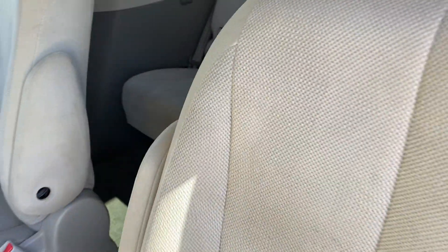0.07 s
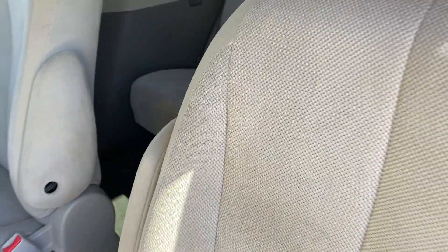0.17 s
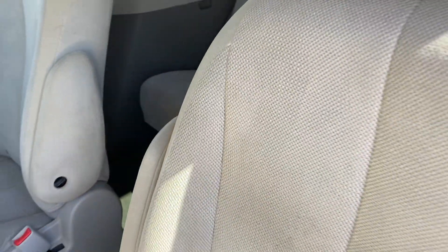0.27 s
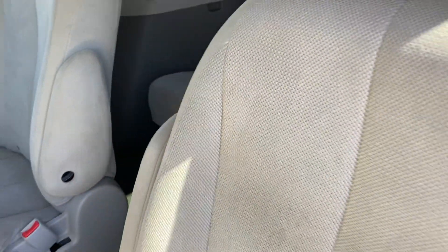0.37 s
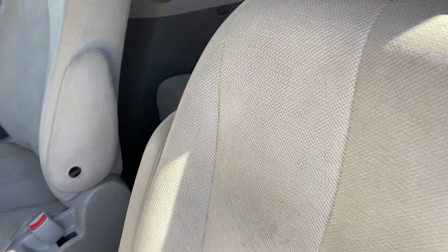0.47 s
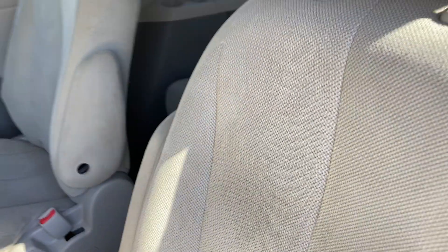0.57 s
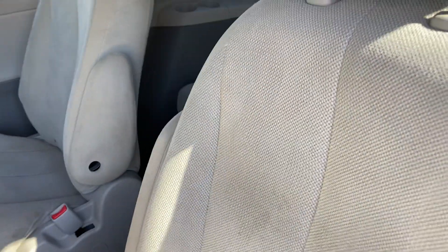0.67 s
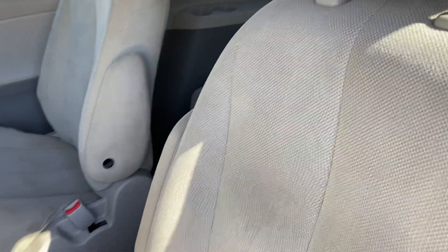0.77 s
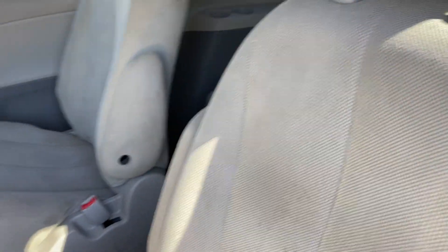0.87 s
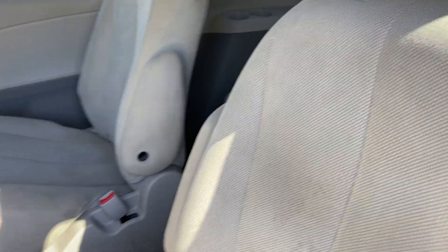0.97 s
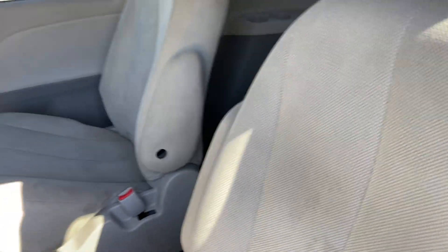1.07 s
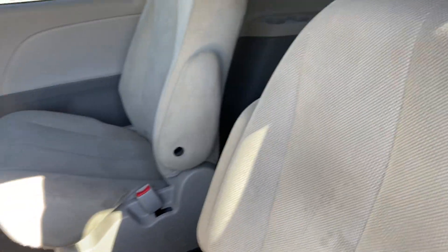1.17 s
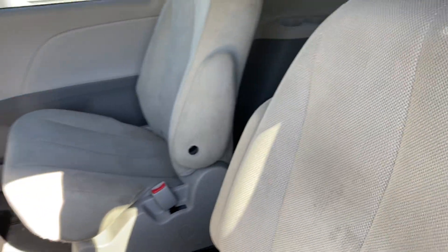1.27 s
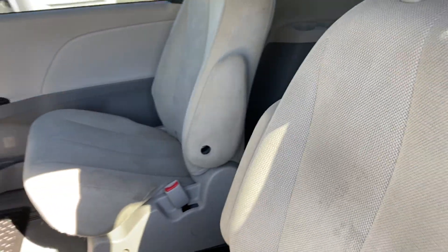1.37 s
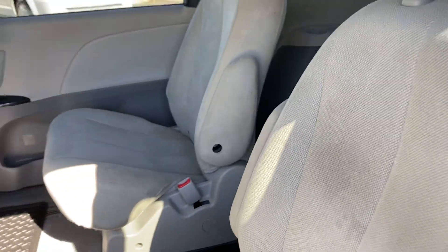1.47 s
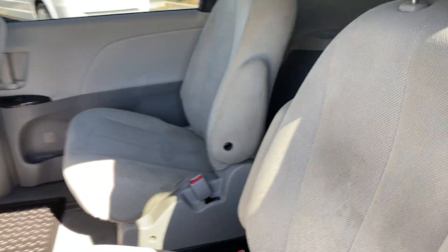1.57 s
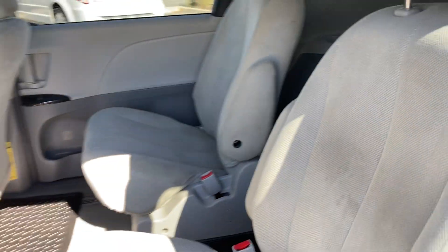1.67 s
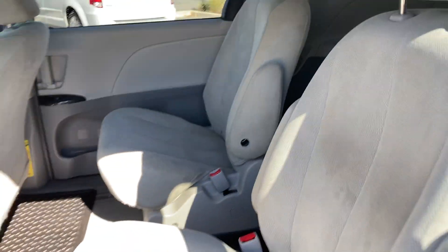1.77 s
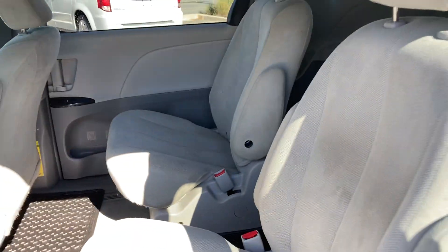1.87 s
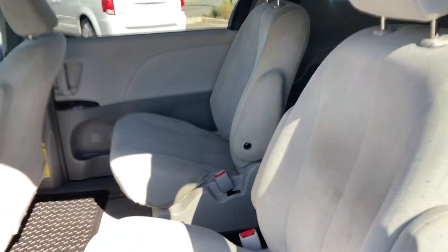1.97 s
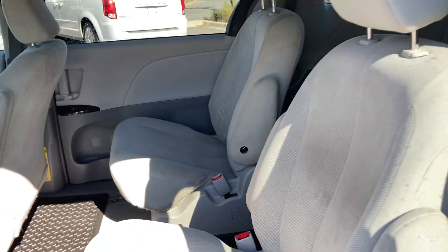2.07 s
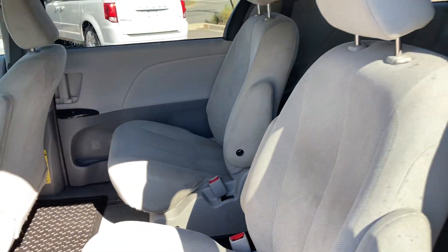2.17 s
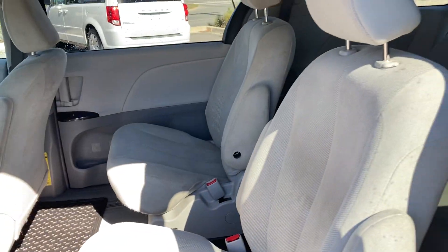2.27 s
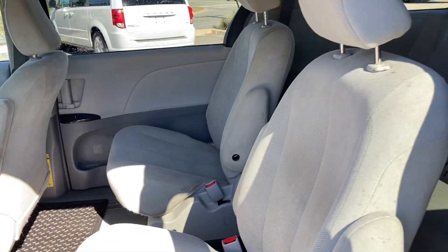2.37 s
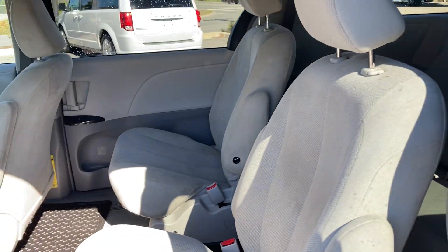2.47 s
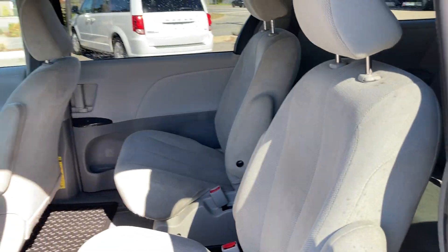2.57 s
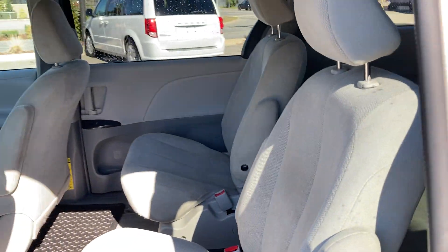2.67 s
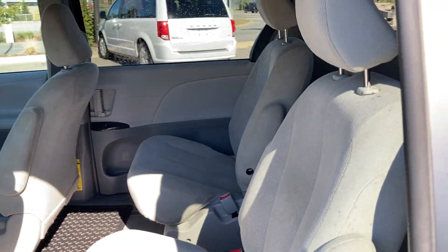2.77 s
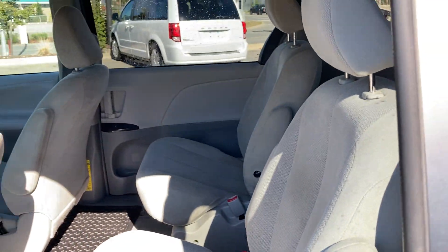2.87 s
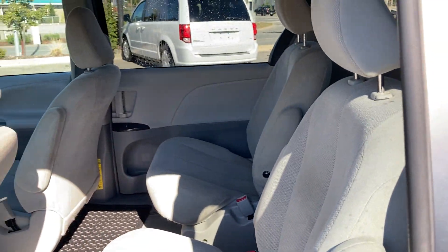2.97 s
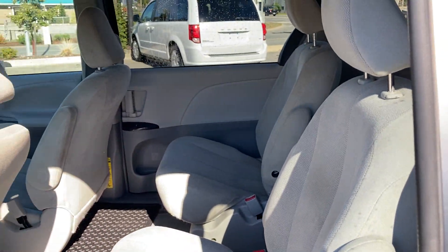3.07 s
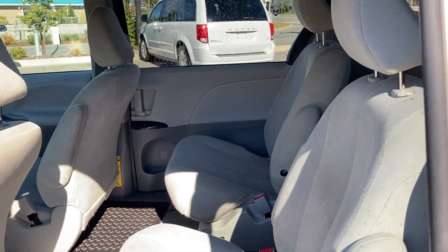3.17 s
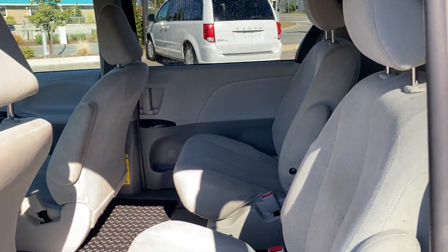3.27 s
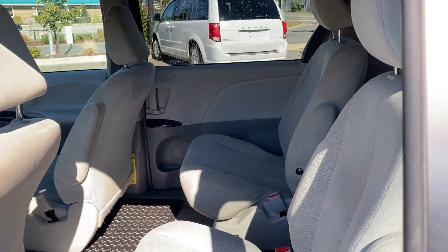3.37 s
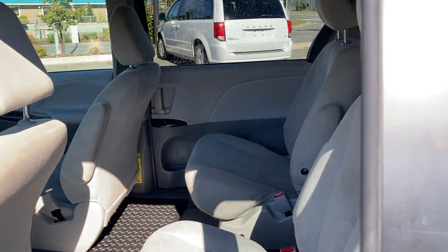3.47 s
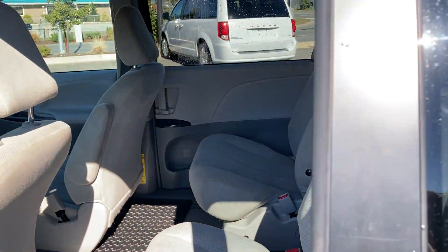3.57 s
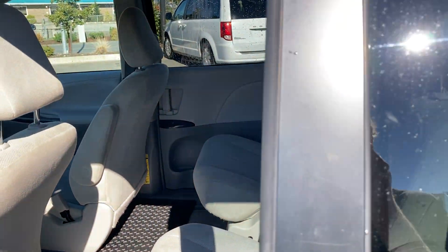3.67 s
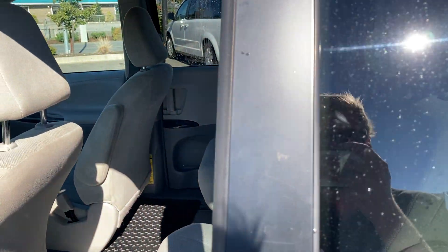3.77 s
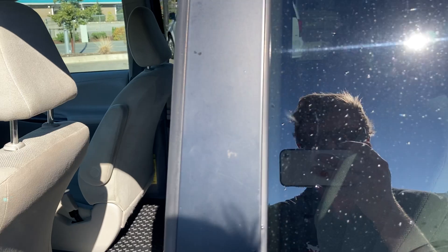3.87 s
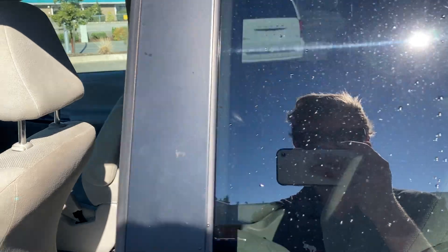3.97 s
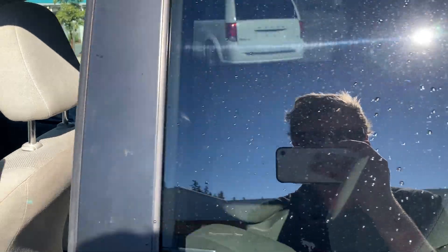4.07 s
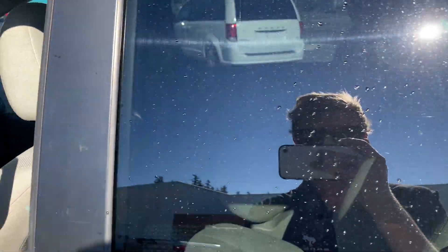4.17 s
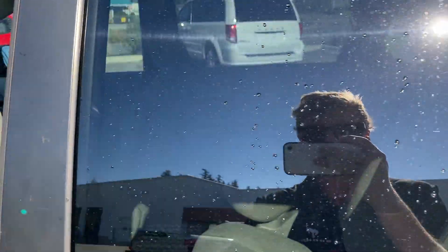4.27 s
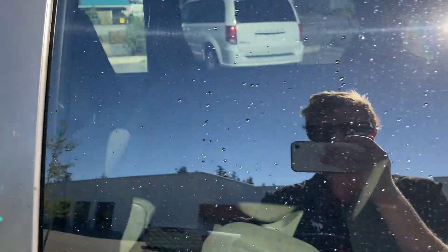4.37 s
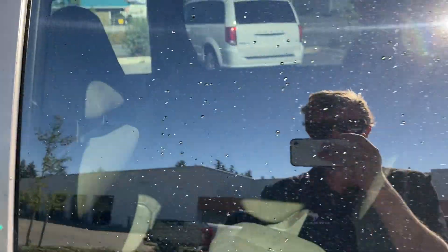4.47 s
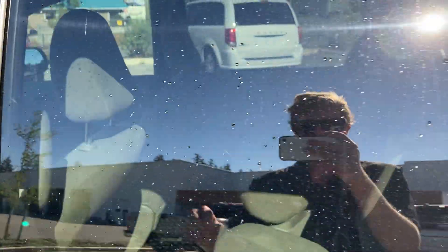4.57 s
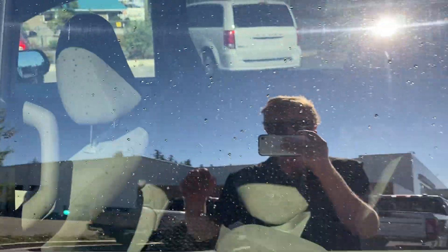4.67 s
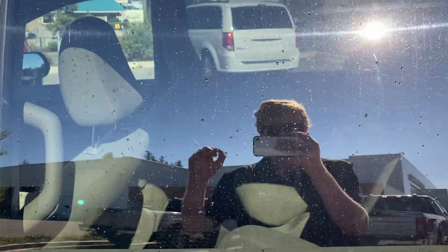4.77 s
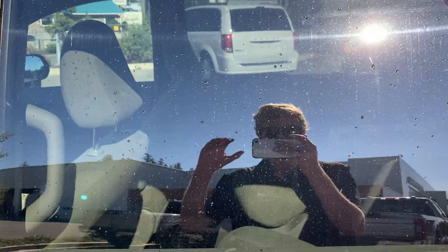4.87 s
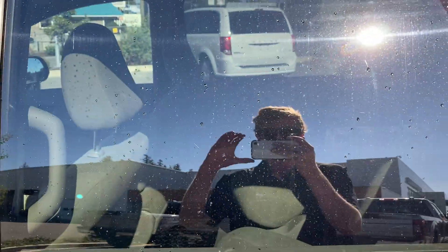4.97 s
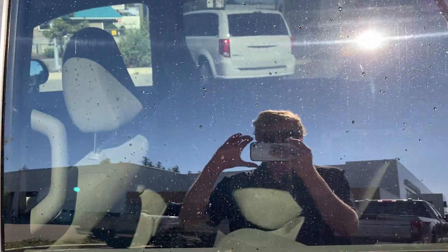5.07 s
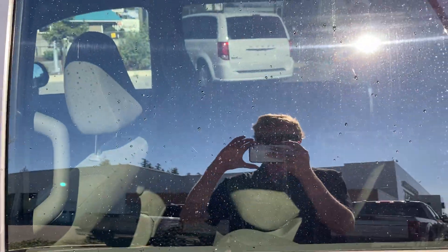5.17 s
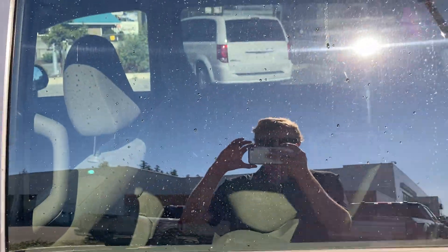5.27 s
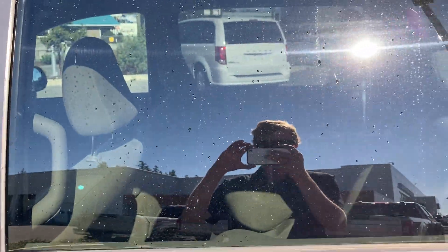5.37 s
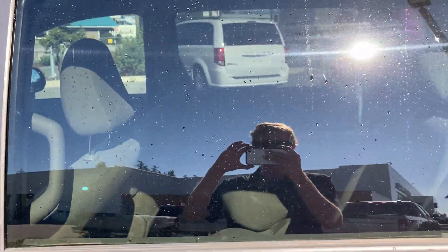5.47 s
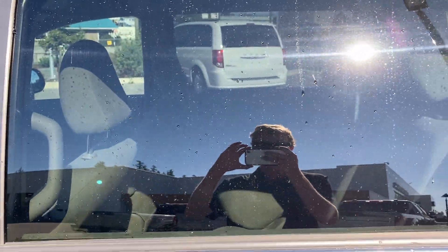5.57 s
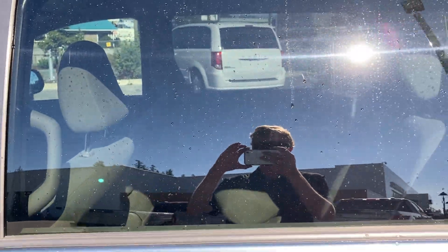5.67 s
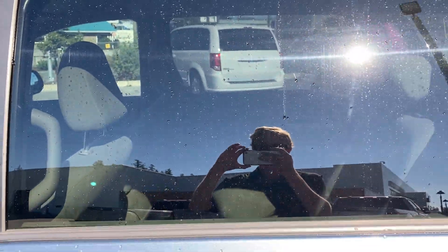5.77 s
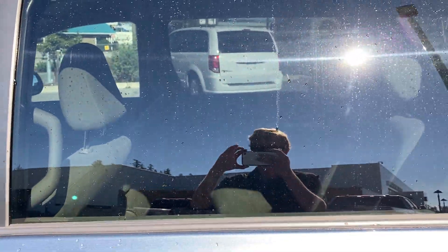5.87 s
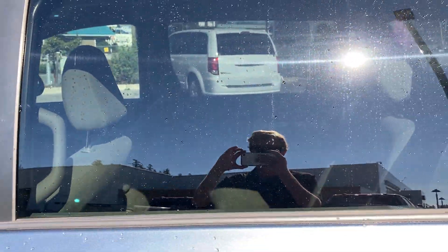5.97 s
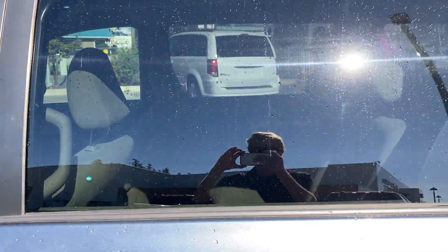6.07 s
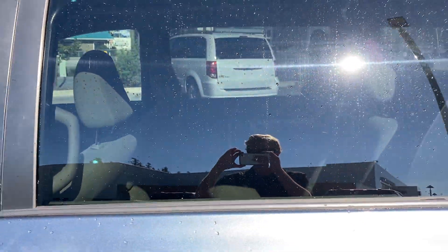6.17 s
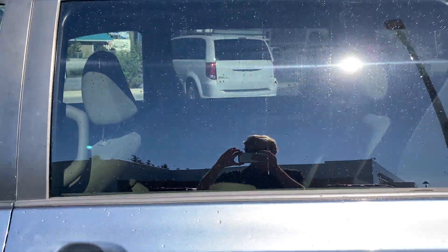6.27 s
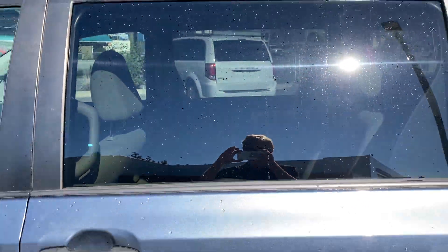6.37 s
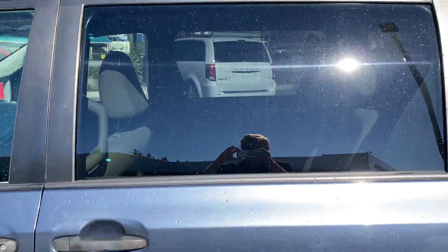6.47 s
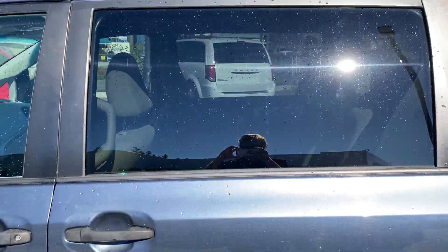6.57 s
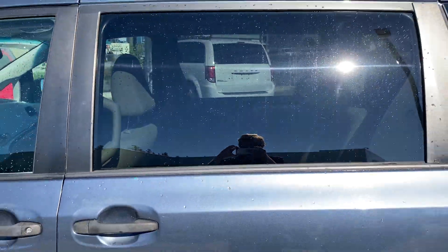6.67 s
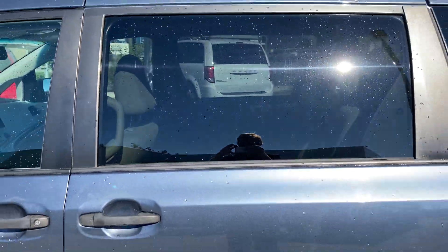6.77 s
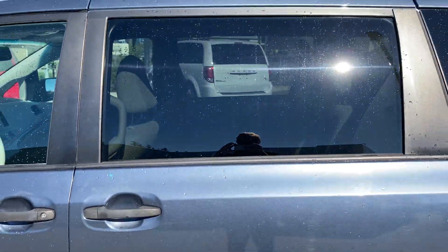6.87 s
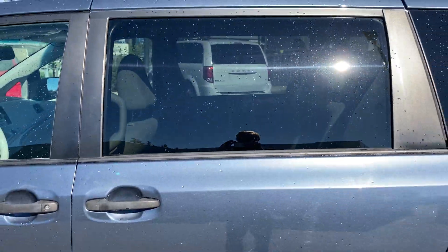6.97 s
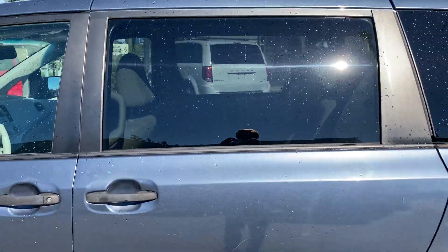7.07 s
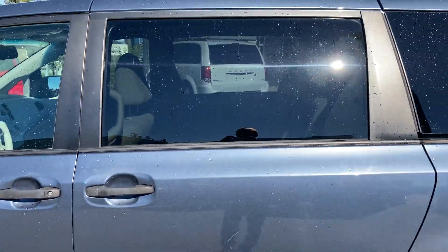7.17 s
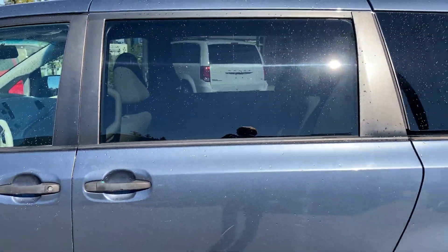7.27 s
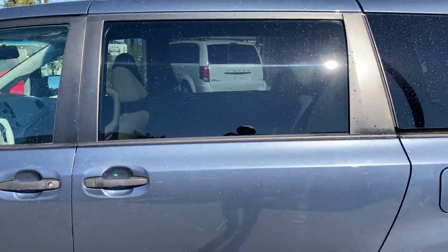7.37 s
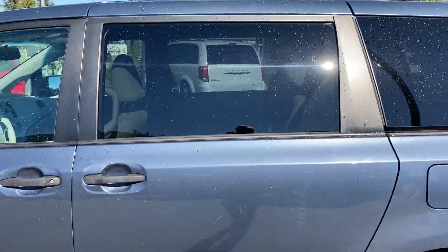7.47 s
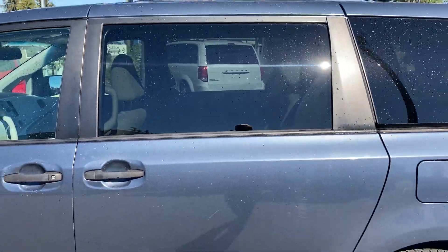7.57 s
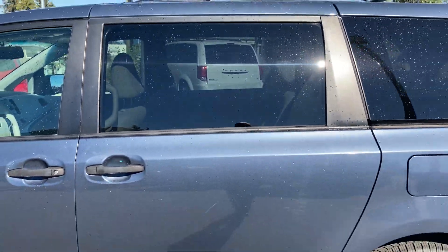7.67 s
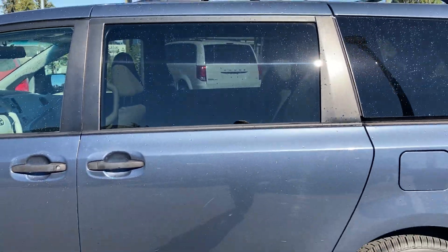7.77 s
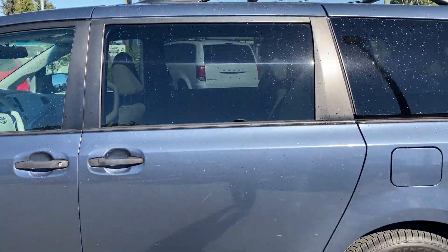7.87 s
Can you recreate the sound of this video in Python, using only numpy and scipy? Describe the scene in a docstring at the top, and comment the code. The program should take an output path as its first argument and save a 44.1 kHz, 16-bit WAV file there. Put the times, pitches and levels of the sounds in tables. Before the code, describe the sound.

In a car park, a low engine drone runs with distant road wash and a thin hiss. A few faint ticks and a scuff sound close to the microphone. Then a minivan's sliding door unlatches with a quick clatter, rumbles along its track with a slight whine and slams shut loudly. A wavering hum comes up afterwards as the drone carries on.

```python
"""A car park, microphone beside a van's sliding door. The handle unlatches, the rollers rumble along the
track, and the door slams in a burst of quick blows that leave the panels booming.
Behind it an idling drone, road wash and a thin hiss run throughout, and a hum comes up once the door
is shut. A few faint ticks and a scuff fall close to the microphone; near the end the treble flickers
thinly around 10 kHz."""
import sys
import numpy as np
from scipy import signal
from scipy.fft import rfft, irfft, next_fast_len
from scipy.io import wavfile
from scipy.ndimage import uniform_filter1d, map_coordinates

SR = 44100
rng = np.random.default_rng(int(sys.argv[2]) if len(sys.argv) > 2 else 0)


def master_out(mix):
    """Clip the mix to full scale and print it as 16-bit PCM to the path in sys.argv[1]."""
    frames = np.transpose(np.atleast_2d(mix))
    ceiling = np.clip(frames, -1, 1)
    pcm = np.round(ceiling * 32767).astype(np.int16)
    wavfile.write(sys.argv[1], SR, pcm)


N = 348831
T = np.arange(N) / SR
AFTER = np.arange(SR // 2) / SR  # seconds since a contact

# Engine and fan rumble, and the late hum. Each row: time in seconds, level in dB.
DRONE_LEVELS = [(0.0, -29.5), (0.45, -29.5), (0.7, -30.5), (1.17, -33), (1.5, -31.5), (1.76, -34.5),
                (2.55, -36), (2.91, -36.5), (3.2, -35), (4.9, -30), (5.2, -38.5), (5.45, -35.5), (6.2, -38),
                (6.5, -34.5), (6.8, -31.5), (7.18, -35.5), (7.5, -31.5), (7.91, -31.5)]
HUM_LEVELS = [(5.3, -56), (5.75, -38), (6.0, -43), (6.17, -29), (6.35, -41), (6.9, -44), (7.2, -38.5),
              (7.65, -34), (7.91, -43)]
# The far background. Each row: time in seconds, then road wash, hiss and top hiss in dB.
WASH_LEVELS = [(0.0, -48, -64.5, -75.5), (0.8, -48.5, -64.5, -79.5), (1.88, -47, -62.5, -76),
               (2.11, -47, -65.5, -83.5), (2.6, -46, -60.5, -83), (4.95, -45, -58.5, -82),
               (5.17, -44, -64, -85), (5.43, -40.5, -63, -86.5), (5.85, -39, -61.5, -84.5),
               (6.42, -41, -59, -76.5), (6.85, -41.5, -58.5, -80.5), (7.14, -40.5, -57, -74.5),
               (7.91, -38.5, -60, -78)]
# Background spectra. Each row: frequency in Hz, relative level in dB.
RUMBLE_SPECTRUM = [(15, -59), (25, -30), (64, -1), (108, -0.5), (174, -4.5), (196, -4), (216, -22),
                   (253, -19), (309, -13), (403, -21), (600, -31.5), (780, -53), (1320, -120)]
ROAD_SPECTRUM = [(15, -31), (35, 2), (70, -6.5), (150, -10.5), (250, 3.5), (315, -16.5), (388, -4.5),
                 (655, -5.5), (816, -1), (994, -8.5), (1280, -7.5), (1640, -14.5), (2060, -16.5),
                 (4000, -33.5), (5200, -59.5), (8800, -120)]
HISS_SPECTRUM = [(1180, -43), (2000, -14), (2570, -9), (3600, -7.5), (4620, -8), (5540, -13.5),
                 (6570, -13.5), (7940, -16.5), (9000, -37.5), (11700, -57), (19800, -120)]
SIDE_HISS_SPECTRUM = [(1180, -25.5), (2000, -4), (2360, -3), (5440, -4.5), (6940, -14.5), (9490, -12.5),
                      (10100, -23), (11400, -34), (13900, -27), (16000, -49)]
TOP_HISS_SPECTRUM = [(9300, -120), (9500, -31.5), (9800, 2.5), (11000, 2), (12300, -5), (13100, -24),
                     (16000, -31)]

# Close ticks, then in the last three rows faint, thin flickers near 10 kHz.
# Each row: start in seconds, level in dB, centre in Hz, octaves each side, t60 in seconds.
TICKS_AND_FLICKERS = [(1.283, -43, 2000, 0.58, .02), (2.022, -31, 3240, 0.25, 0.0096),
                      (2.022, -26.5, 650, 0.6, 0.014), (2.022, -35, 6500, 0.5, 0.008),
                      (2.022, -42, 12000, 0.4, 0.0063), (2.511, -40, 1800, 0.59, .025),
                      (2.522, -38.5, 2700, 0.12, 0.028), (3.104, -32.5, 2770, 0.27, 0.024),
                      (3.899, -46, 6000, 0.44, .02), (4.358, -47, 8000, 0.67, 0.021),
                      (4.445, -33.5, 3800, 0.32, 0.043), (4.444, -35, 7360, 0.18, .03),
                      (4.445, -44, 11300, 0.18, 0.037), (5.945, -52, 8000, 0.66, 0.037),
                      (6.366, -43.5, 5000, 0.32, 0.16), (6.384, -41, 4520, 0.1, 0.065),
                      (6.384, -44, 9800, 0.55, 0.038), (6.465, -61, 10500, 0.3, .15),
                      (6.565, -60, 11000, 0.6, .12), (6.75, -53, 3400, 0.2, 0.54),
                      (6.96, -49, 3500, 0.25, 0.65), (7.005, -54, 12000, 0.34, .15),
                      (7.18, -62, 10000, .1, .2), (7.25, -66, 11100, 0.4, .1), (7.3, -58, 10000, .1, 0.18)]
# The scuff's catches and slips. Each row: start in seconds, level in dB.
SCUFF_SLIPS = [(1.773, -48), (1.783, -46), (1.796, -48), (1.806, -43), (1.820, -47), (1.837, -51),
               (1.846, -56)]
# Spectra of the scuff and its tail. Each row: frequency in Hz, relative level in dB.
SCUFF_SPECTRUM = [(880, -36), (1500, -1.5), (2230, 4), (3350, -11), (4780, -8), (6000, -14), (7320, -5.5),
                  (9370, -21), (10600, -7), (13500, -17), (16000, -16.5)]
TAIL_SPECTRUM = [(900, -40), (1500, 0), (2200, 1), (2900, -14), (4500, -39)]

# The door's travel. Each row: time in seconds, rumble in dB, grind in dB.
ROLL_LEVELS = [(3.398, -31, -59), (3.58, -28.5, -47.5), (3.9, -27, -42.5), (4.19, -24, -50),
               (4.43, -24.5, -41.5), (4.66, -25, -44), (4.74, -27, -39.5)]
# Rough spots in the track. Each row: start in seconds, level in dB, ring in Hz.
TRACK_BUMPS = [(3.413, -18.5, 442), (3.424, -17.5, 190), (3.486, -18, 270), (3.993, -15.5, 270),
               (4.208, -20, 225), (4.359, -10.5, 257), (4.399, -13, 415), (4.508, -6.5, 265),
               (4.565, -7, 294), (4.658, -9, 300.6)]
# The rollers' tone, rising with speed. Each row: time in seconds, pitch in Hz, level in dB.
ROLLER_WHINE = [(3.45, 520, -49), (3.8, 546, -44), (4.1, 567.5, -40), (4.4, 587, -41), (4.53, 600, -36),
                (4.6, 655, -27), (4.68, 601, -38), (4.74, 580, -44)]
# Spectra of the moving door. Each row: frequency in Hz, relative level in dB.
TRACK_SPECTRUM = [(18, -40), (30, -13), (60, 0), (108, -3.5), (144, -8.5), (210, 1), (275, 0.5), (355, -7),
                  (430, -2.5), (500, -10), (590, -14), (714, -19), (1000, -23), (1300, -51.5), (2200, -120)]
GRIND_SPECTRUM = [(470, -28.5), (800, -3), (1030, -3.5), (1170, -10.5), (1290, -0.5), (1700, -11),
                  (3000, -25), (3900, -53), (6600, -120)]
SEAL_SPECTRUM = [(1760, -25), (3000, 1.5), (7940, -23), (8820, -21), (9200, -49.5), (9600, -23),
                 (10700, -11.5), (12300, -18), (13700, -41.5), (15000, -27), (16000, -49)]

# Latch and door contacts. Each row: start in seconds, then snap, clack, thud and steel ring in dB,
# then a factor on the length of snap and clack.
DOOR_BLOWS = [(3.185, -34.5, -31.5, -23, -50, 0.78), (3.196, -44, -34.5, -27, -50, 1.7),
              (3.225, -26, -48, -29.5, -48, 0.79), (3.239, -30, -19.5, -25, -37, 0.54),
              (3.26, -15.5, -21.5, -27, -34, 0.74), (3.275, -33.5, -30.5, -28, -46.5, 0.58),
              (3.29, -50.5, -34, -19.5, -52, 0.91), (3.301, -51, -41.5, -25, -60, 1.4),
              (4.556, -46, -32, -18, -51, 0.99), (4.717, -40, -39.5, -22, -59.5, 0.74),
              (4.737, -54, -29.5, -15, -52, .9), (4.747, -40, -20, -15.5, -38, 0.94),
              (4.751, -42, -14.5, -16, -33, 0.86), (4.768, -13, -22.5, -31, -33, 0.93),
              (4.778, -24, -26.5, -13, -40.5, 0.88), (4.789, -11.5, -17.5, -10, -31, 0.75),
              (4.800, -25.5, -22.5, -20.5, -40, 1.05), (4.815, -32.5, -16.5, -11.5, -27, 0.76),
              (4.832, -44, -29, -21, -41.5, 1.3), (4.86, -49.5, -41, -19.5, -50.5, 1.6)]
# Hollow knocks of the door skin. Each row: start in seconds, level in dB, ring in Hz, t60 in seconds.
SKIN_KNOCKS = [(3.244, -14.5, 333, 0.091), (3.257, -16.5, 253, 0.072), (3.287, -14, 222, 0.065),
               (3.408, -20, 85, 0.1), (4.749, -2.5, 422, 0.068), (4.778, -1, 427, 0.037),
               (4.778, -8, 169, 0.085), (4.822, -10, 213, .08)]
# Modes of door and body shell, deepest first, and of latch and striker.
# Each row: frequency in Hz, relative level in dB, t60 in seconds before any extra damping.
PANEL_MODES = [(57.4, 1.5, 0.36), (157, -16.5, 0.81), (187, 0, 0.23), (227, -1.5, 0.35), (339.5, 1, 0.43),
               (408.5, -5.5, 0.78), (478, -6.5, 0.62), (504, -19, 0.18), (758, -12, 0.17)]
LATCH_MODES = [(1371, 6.5, 0.1), (1776, -7, 0.15), (2000, -9, 0.08), (2560, 0, 0.042), (3150, 2.5, 0.043),
               (3960, -11, 0.053), (4880, -2.5, 0.056), (6430, -12, 0.0508), (7520, -17, .06),
               (8120, -13, 0.054), (10650, -21, 0.035), (11800, -10, 0.0403)]
# Spectra of a blow. Each row: frequency in Hz, relative level in dB.
SNAP_SPECTRUM = [(1760, -1), (3000, -4), (3340, -10), (4080, -1), (5950, -9.5), (6440, -4.5), (7580, -0.5),
                 (8620, -4), (9190, -32.5), (9800, -4), (11600, -5), (13300, -13.5), (13600, -18),
                 (15800, -11), (16500, -45)]
CLACK_SPECTRUM = [(290, -32), (500, -3.5), (1030, -7), (1310, -8), (1930, -16), (2470, -12), (2780, -18.5),
                  (3970, -20), (5000, -33.5), (6500, -31.5), (11000, -120)]
TRIM_SPECTRUM = [(53, -30), (90, 8.5), (308, 7.5), (420, -0.5), (586, -4.5), (703, -5), (754, -26),
                 (1000, -6.5), (1300, -34.5), (2200, -120)]

# Stereo width far off, close up and along the track. Each row: frequency in Hz, side minus mid in dB.
FAR_WIDTH = [(60, -21), (180, -13), (550, -4.5), (1650, -0.5), (4970, -0.5), (15000, 0.5)]
NEAR_WIDTH = [(60, -16), (99, -20), (160, -16.5), (270, -11.5), (450, -9.5), (740, -3.5), (1220, -11),
              (2010, -2.5), (3330, -2), (5500, 0), (9080, 1.5), (15000, 1.5)]
TRACK_WIDTH = [(60, -20.5), (240, -14.5), (950, -3.5), (3770, 0), (15000, -5)]
# The van's balance at the microphone. Each row: frequency in Hz, left minus right in dB.
VAN_BALANCE = [(60, -2.5), (180, -3.5), (550, -0.5), (1650, 2.5), (4970, -2), (15000, 0)]


def amp(db):
    return 10 ** (np.asarray(db) / 20)


def unit(x):
    return x / np.sqrt(np.mean(x ** 2) + 1e-20)


def along(points, hz):
    """Read (Hz, value) points on a log frequency axis."""
    freqs, values = np.transpose(points)
    return np.interp(np.log(hz + 1), np.log(freqs + 1), values)


def curves(rows):
    """One value per sample for each column after the time."""
    times, *columns = np.transpose(rows)
    return [np.interp(T, times, column) for column in columns]


def wobble(rate):
    """A smooth random curve, rate knots a second."""
    return map_coordinates(rng.standard_normal(int(N * rate / SR) + 4), [T * rate])


def filtered(x, response):
    """Apply a complex response, given as a function of Hz."""
    size = next_fast_len(N + 8192)
    return irfft(rfft(x, size) * response(np.fft.rfftfreq(size, 1 / SR)), size)[..., :N]


def noise(spectrum, patchy_db=0, streaky_db=0):
    """Two unrelated coloured noises of rms 1, sharing broad patches and narrow streaks of random gain."""
    white = signal.stft(rng.standard_normal((2, N)), nperseg=1024)[2]
    a, b = rng.standard_normal((2,) + white.shape[1:])
    patches = uniform_filter1d(uniform_filter1d(a, size=10, axis=0), size=6, axis=1)
    streaks = uniform_filter1d(b, size=14, axis=1)
    gain = amp(patchy_db * unit(patches) + streaky_db * unit(streaks))
    pair = signal.istft(white * gain, nperseg=1024)[1][:, :N]
    return unit(filtered(pair, lambda hz: amp(along(spectrum, hz))))


def stereo(pair, width, direct):
    """Left and right: the direct share of the side signal is a phase shift between microphone ports."""
    shifted, diffuse = filtered(pair, lambda hz: amp(along(width, hz)) * np.array([[1j], [1]]))
    side = np.sqrt(direct) * shifted + np.sqrt(1 - direct) * diffuse
    return np.array([pair[0] + side, pair[0] - side])


def placed(start, sound):
    """A short sound set down at start seconds."""
    out = np.zeros(sound.shape[:-1] + (N + SR,))
    out[..., round(start * SR):][..., :sound.shape[-1]] = sound
    return out[..., :N]


def dying(db, t60, rise):
    """Envelope of one short sound: it swells over rise seconds and falls 60 dB in t60 seconds."""
    return amp(db - 60 * AFTER / t60) * (1 - np.exp(-AFTER / rise)) ** 2


def ping(hz, db, t60, rise):
    """One struck mode dying away."""
    return dying(db, t60, rise) * np.sin(2 * np.pi * hz * AFTER)


def modes(table, db, t60_scale, rise):
    """An object rings at new strengths and slightly new pitches after each blow."""
    chance = rng.standard_normal((len(table), 2))
    return sum(ping(hz * (1 + 0.016 * detune), db + level + 3.1 * louder, t60 * t60_scale, rise)
               for (hz, level, t60), (louder, detune) in zip(table, chance))


def idling_drone():
    """Lumpy engine and fan rumble, joined late by a wavering hum."""
    (drone_db,), (hum_db,) = curves(DRONE_LEVELS), curves(HUM_LEVELS)
    rumble = amp(drone_db + 0.65 * wobble(12)) * noise(RUMBLE_SPECTRUM, streaky_db=3)
    hum_gain = amp(hum_db + 1.2 * wobble(5.6))
    hum_hz = 204.7 + 5 * wobble(6)
    return rumble + hum_gain * np.sin(2 * np.pi * np.cumsum(hum_hz) / SR)


def car_park():
    """Drone and road wash far off and a shade to the right, under a thin, wide hiss."""
    road_db, hiss_db, top_db = curves(WASH_LEVELS)
    drone = idling_drone()
    road = amp(road_db + 0.26 * wobble(3.7)) * noise(ROAD_SPECTRUM, patchy_db=1.04, streaky_db=2.5)
    hiss = amp(hiss_db) * noise(HISS_SPECTRUM, patchy_db=2, streaky_db=2)[0]
    hiss += amp(top_db) * noise(TOP_HISS_SPECTRUM, patchy_db=3.5)[0]
    side = amp(hiss_db + 1) * noise(SIDE_HISS_SPECTRUM, patchy_db=1.5, streaky_db=1)[0]
    distant = stereo(drone + road, FAR_WIDTH, direct=0.15) * amp([[-0.28], [0.28]])
    return distant + [hiss + side, hiss - side]


def noise_puff(db, hz, octaves, t60):
    """A puff of noise in a band around its own pitch."""
    edges = np.clip(hz * 2.0 ** np.array([-octaves, octaves]), 100, SR / 2.2)
    band = signal.butter(3, edges, "band", fs=SR, output="sos")
    puff = signal.sosfilt(band, rng.standard_normal((2, len(AFTER))))
    return dying(db, t60, rise=0.046 * t60) * unit(puff)


def ticks_scuff_and_flickers():
    """Close ticks, a scuff that catches, slips and leaves a dull rustle, and late, thin treble flickers."""
    puffs = sum(placed(s, noise_puff(*shape)) for s, *shape in TICKS_AND_FLICKERS)
    slips = sum(placed(s, dying(db, t60=0.071, rise=0.0012)) for s, db in SCUFF_SLIPS)
    scuff = slips * noise(SCUFF_SPECTRUM, patchy_db=2.5)
    tail = placed(1.785, dying(-46.5, t60=0.92, rise=0.023)) * noise(TAIL_SPECTRUM, patchy_db=-0.5)
    return stereo(puffs + scuff + tail, NEAR_WIDTH, direct=0.6)


def rollers():
    """Wheels grind and whine on the track, shaking the body; the seal swishes and rough spots knock."""
    rumble_db, grind_db = curves(ROLL_LEVELS)
    start, stop, fade_s = ROLL_LEVELS[0][0], ROLL_LEVELS[-1][0], 0.076
    moving = np.clip(np.minimum(T - start, stop - T) / fade_s + 0.5, 0, 1)
    rumble = amp(rumble_db + 0.51 * wobble(30)) * noise(TRACK_SPECTRUM, patchy_db=0.5, streaky_db=1)
    body = amp(rumble_db - 12 + 1.6 * wobble(5)) * noise(RUMBLE_SPECTRUM, streaky_db=5.5)
    grind = amp(grind_db) * noise(GRIND_SPECTRUM, patchy_db=2, streaky_db=6.5)
    swish_db = -63.5 + 0.56 * (rumble_db - ROLL_LEVELS[1][1])  # follows part of the rumble's swing
    swish = amp(swish_db) * noise(SEAL_SPECTRUM, patchy_db=4)
    bumps = sum(placed(s, ping(hz, db, t60=0.074, rise=0.0026)) for s, db, hz in TRACK_BUMPS)
    whine_hz, whine_db = curves(ROLLER_WHINE)
    roughness = wobble(29.93)
    whine = amp(whine_db) * roughness * np.sin(2 * np.pi * np.cumsum(whine_hz) / SR)
    return stereo(moving * (rumble + body + grind + swish + whine) + bumps, TRACK_WIDTH, direct=0.15)


def shell_boom(db, rise):
    """The van's body booms in its deepest mode."""
    hz, level, t60 = PANEL_MODES[0]
    return ping(hz, db + level, t60, rise)


def ringing(thud_db, steel_db):
    """One blow sets the damped panels, the latch steel and the body shell ringing."""
    panels = modes(PANEL_MODES[1:], thud_db, t60_scale=0.14, rise=0.0015)
    latch = modes(LATCH_MODES, steel_db, t60_scale=0.82, rise=0.00053)
    return shell_boom(thud_db - 24.5, rise=0.011) + panels + latch


def latch_and_slam():
    """Each contact snaps, clacks, rattles the trim and rings; the skin knocks and the shut door booms."""
    snap_env, clack_env, rattle_env = np.zeros((3, N))
    for start, snap_db, clack_db, thud_db, _, length in DOOR_BLOWS:
        snap_env += placed(start, dying(snap_db, t60=0.054 * length, rise=0.0016))
        clack_env += placed(start, dying(clack_db, t60=0.086 * length, rise=0.0021))
        rattle_env += placed(start, dying(thud_db - 4, t60=0.16, rise=0.0027))
    snap = snap_env * noise(SNAP_SPECTRUM, streaky_db=-2)
    clack = clack_env * noise(CLACK_SPECTRUM, streaky_db=2.5)
    rattle = rattle_env * noise(TRIM_SPECTRUM)
    ring = sum(placed(s, ringing(thud_db, steel_db)) for s, _, _, thud_db, steel_db, _ in DOOR_BLOWS)
    boom = placed(4.792, shell_boom(-5, rise=0.012))  # the door's weight settles on its seals
    knocks = sum(placed(s, ping(hz, db, t60, rise=0.0012)) for s, db, hz, t60 in SKIN_KNOCKS)
    body = clack + rattle + ring + boom + knocks
    return stereo(snap, NEAR_WIDTH, direct=0.75) + stereo(body, NEAR_WIDTH, direct=0.35)


def scene():
    """The car park as heard from beside the van."""
    door = rollers() + latch_and_slam()
    van = filtered(door, lambda hz: amp(along(VAN_BALANCE, hz) * np.array([[0.5], [-0.5]])))
    return car_park() + van + ticks_scuff_and_flickers()


def record(dry):
    """The microphone rounds off the loudest peaks and keeps nothing above its band limit."""
    ceiling, top_hz = 0.95, 16400
    soft = dry / (1 + np.abs(dry / ceiling) ** 4) ** (1 / 4)
    return filtered(soft, lambda hz: hz < top_hz)


dry = scene()
out = record(dry)
master_out(out)
```